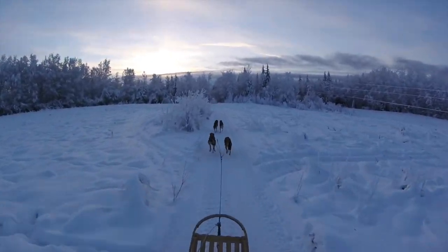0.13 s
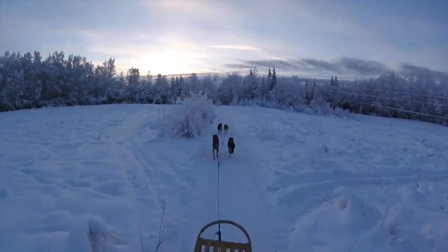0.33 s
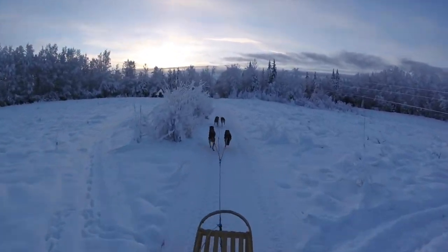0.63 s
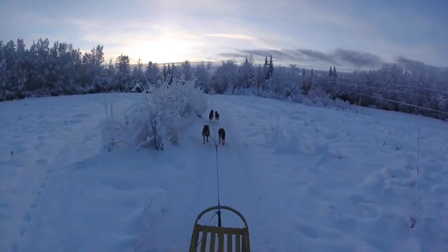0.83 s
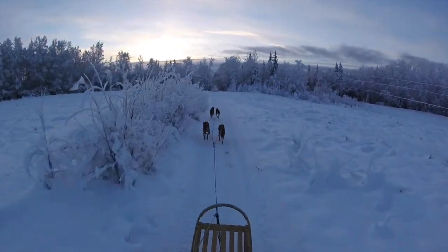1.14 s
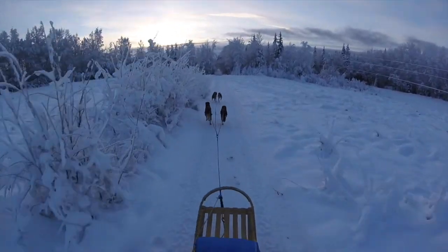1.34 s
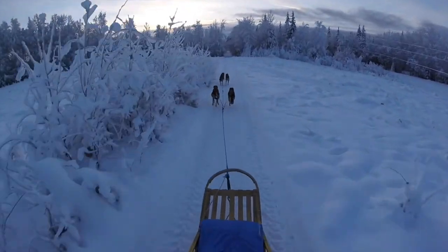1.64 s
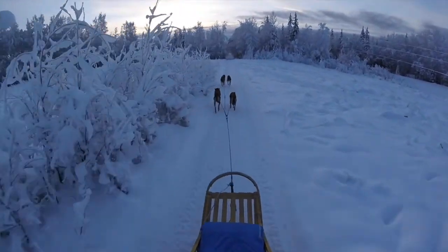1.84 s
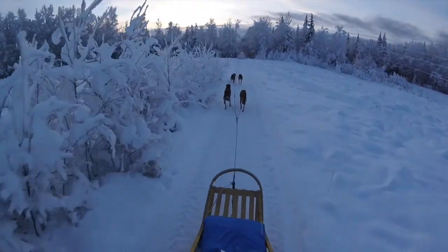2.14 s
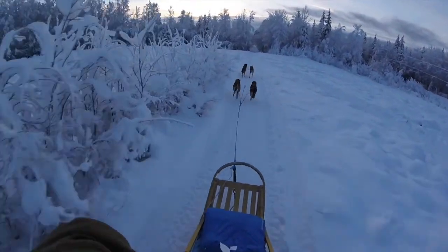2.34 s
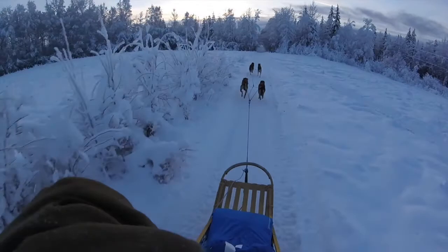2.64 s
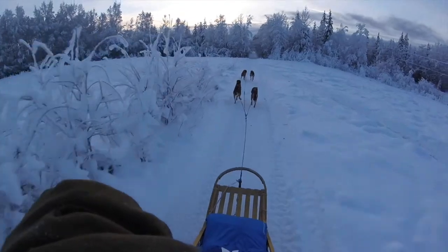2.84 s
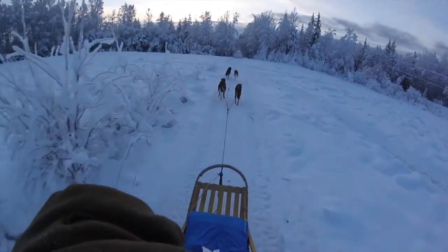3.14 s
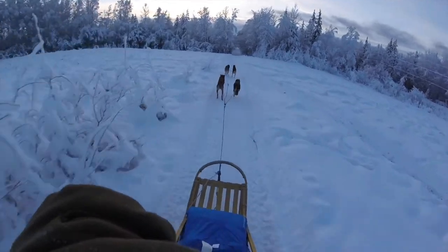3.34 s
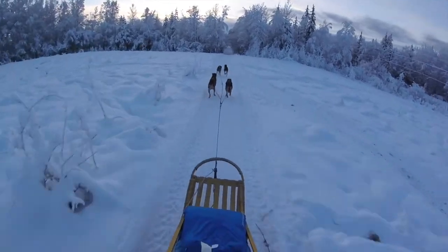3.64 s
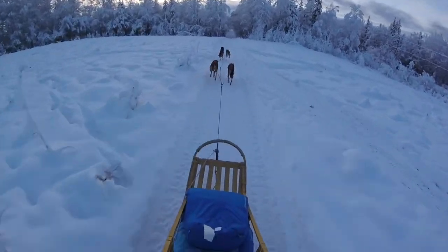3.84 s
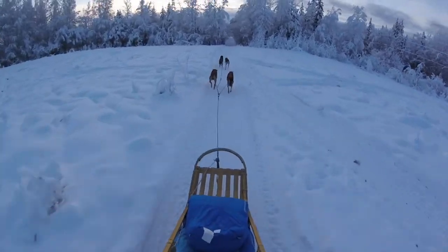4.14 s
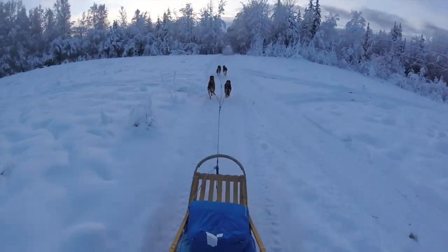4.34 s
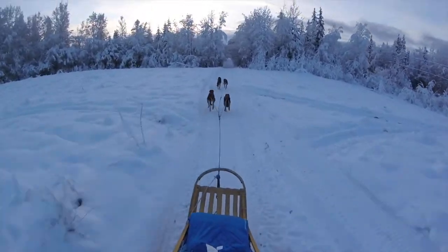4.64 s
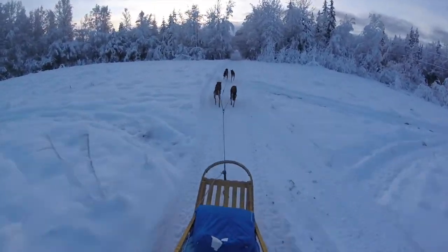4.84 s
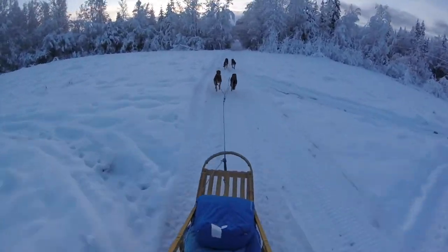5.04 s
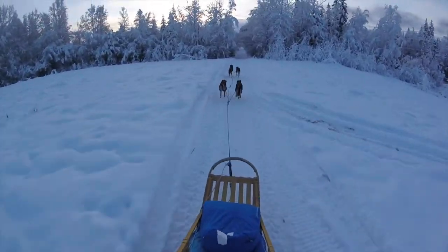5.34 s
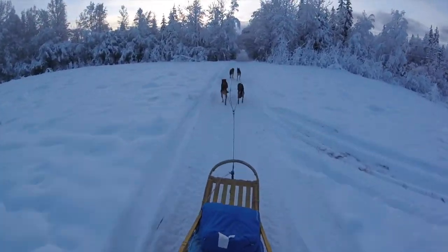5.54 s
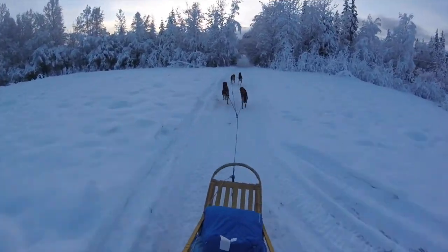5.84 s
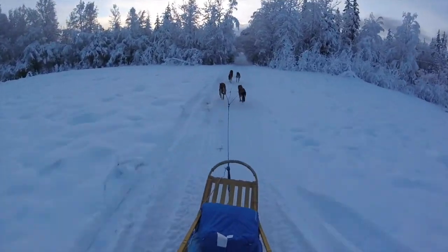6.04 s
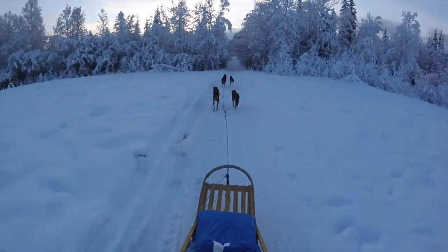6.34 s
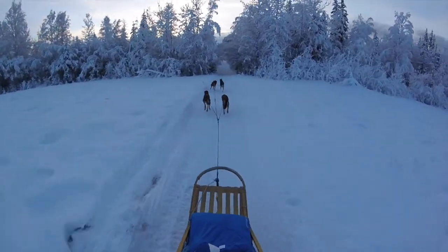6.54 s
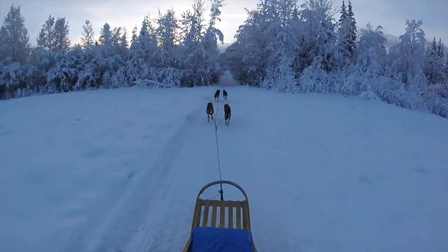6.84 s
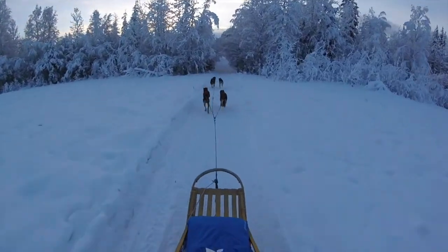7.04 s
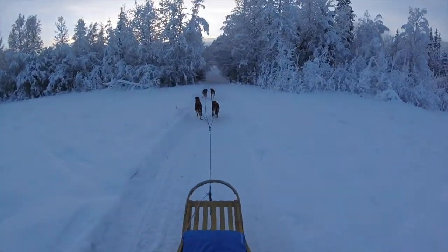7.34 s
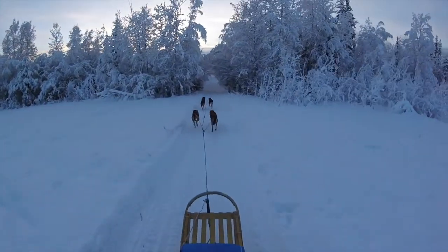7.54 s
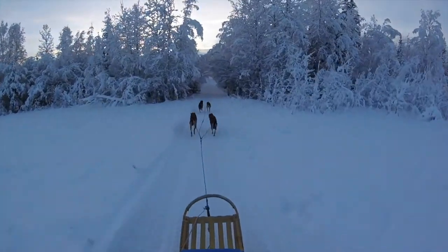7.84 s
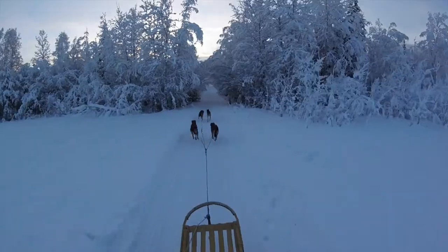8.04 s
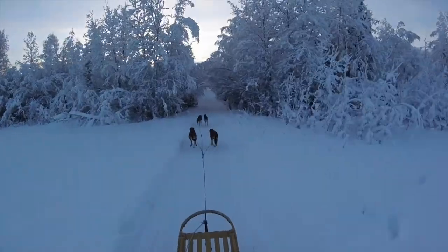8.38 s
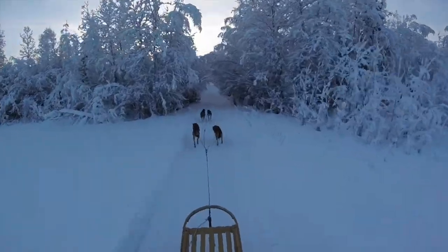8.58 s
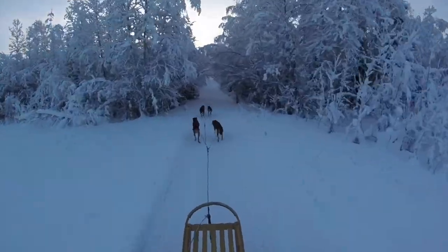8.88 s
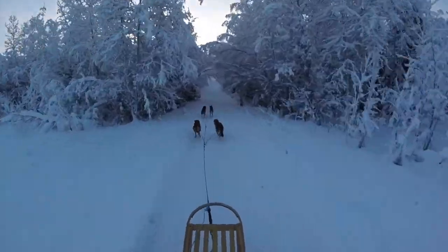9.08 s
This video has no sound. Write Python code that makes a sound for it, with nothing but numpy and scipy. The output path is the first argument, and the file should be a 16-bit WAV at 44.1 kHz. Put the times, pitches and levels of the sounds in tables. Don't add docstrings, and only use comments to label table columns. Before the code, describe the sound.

Steady crisp snow hiss under a gliding dog sled, with small crunches and creaks, increasingly buried by low, thudding wind buffeting.

```python
import sys
import numpy as np
from scipy import signal
from scipy.fft import rfft, irfft
from scipy.io import wavfile
from scipy.ndimage import uniform_filter1d

SR = 44100
rng = np.random.default_rng(int(sys.argv[2]) if len(sys.argv) > 2 else 0)


def dump(signal):
    limited = np.clip(np.atleast_2d(signal).T, -1, 1)
    pcm = np.round(limited * 32767).astype(np.int16)
    wavfile.write(sys.argv[1], SR, pcm)


def gain_from_db(level_db):
    decades = np.asarray(level_db, float) / 20
    return 10 ** decades


N = 406161
TIME = np.arange(N) / SR


def rms_one(x):
    return x / np.sqrt(np.mean(x ** 2) + 1e-20)


def in_time(rows):
    s, *columns = np.transpose(rows)
    return [np.interp(TIME, s, column) for column in columns]


def drift(rate):
    r = np.exp(-40 * np.pi * rate / SR)
    noise = rng.standard_normal(N // 20 + 2002)
    slow = signal.lfilter([1], [1, -2 * r, r * r], noise)[2000:]
    return np.interp(np.arange(N) / 20, np.arange(len(slow)), rms_one(slow))


def colour(x, spectrum):
    hz, db = np.transpose(spectrum)
    grid = np.fft.rfftfreq(8192, 1 / SR) + 1
    gain = gain_from_db(np.interp(np.log(grid), np.log(hz), db))
    cepstrum = irfft(np.log(gain))
    cepstrum[1:4096] *= 2
    cepstrum[4097:] = 0
    return signal.fftconvolve(x, irfft(np.exp(rfft(cepstrum))))[:N]


def cut(x, hz, kind):
    return signal.sosfilt(signal.butter(3, hz, kind, fs=SR, output="sos"), x)


def grains(per_s, spread_db, share):
    sizes = gain_from_db(spread_db * np.minimum(rng.exponential(1, N), 5)) * rng.choice((-1, 1), N)
    clicks = rms_one(sizes * (rng.random(N) < per_s / SR))
    return np.sqrt(share) * clicks + np.sqrt(1 - share) * rng.standard_normal(N)


def resonate(x, hz, width_hz):
    r = np.exp(-np.pi * width_hz / SR)
    poles = [1, -2 * r * np.cos(2 * np.pi * hz / SR), r * r]
    return signal.lfilter([(1 - r * r) / 2, 0, (r * r - 1) / 2], poles, x)


def swell(s, length):
    at = slice(int(s * SR), min(N, int((s + length) * SR)))
    return at, np.sqrt(np.hanning(at.stop - at.start))


# t/s, hiss level/dB, dull scrape of the load level/dB re hiss
GLIDE = [(0.0, -39, -11), (0.46, -40, -10), (1.31, -38, -10.5), (1.51, -35.5, -10.5), (2.67, -35, -12),
         (3.1, -37, -11.5), (3.33, -37, -12.5), (4.0, -33.5, -12.5), (4.74, -36, -13), (5.87, -34, -12.5),
         (6.1, -36, -12), (6.59, -34.5, -12.5), (7.39, -37, -9), (7.9, -36.5, -11), (8.26, -38, -9),
         (8.54, -36.5, -8), (8.87, -36, -9), (9.21, -37.5, -11)]
# t/s, length/s, hiss change/dB
PATCHES = [(0.023, 0.097, 3), (0.364, 0.13, 3), (0.66, 0.23, 2.5), (1.04, 0.096, 1.5), (1.433, 0.062, 3.5),
           (1.736, 0.042, 2.5), (1.914, 0.12, 3), (2.125, 0.12, 1), (2.34, 0.057, 2), (3.127, 0.099, 2),
           (4.79, .05, 3), (4.84, .08, -1.5), (5.383, 0.065, 0.5), (5.604, 0.16, 2), (6.268, 0.1, 2.5),
           (6.4, 0.11, 2), (6.798, 0.066, 4), (6.847, 0.028, 1), (7.153, 0.12, 3.5), (7.86, 0.077, 1),
           (8.15, 0.054, -3), (8.195, 0.056, 1), (8.24, 0.089, -2), (8.326, 0.12, 2.5), (8.885, 0.14, 2)]
# t/s, peak level/dB, dull part level/dB re peak
CRUNCHES = [(0.07, -26, -12), (0.4434, -29, -20), (0.4886, -24, -18), (0.7571, -29, -22), (1.264, -24, -18),
            (1.7535, -19.5, -7), (0.381, -29, -20), (0.42, -28, -14), (1.017, -26, -10), (1.298, -28, -10),
            (1.493, -30, -10), (1.995, -26, -7), (2.365, -22, -21), (2.408, -23, -23), (2.388, -25, -14),
            (2.658, -34, -10), (2.95, -28, -12), (3.664, -33, -4), (3.62, -32, 0), (3.71, -36, -2),
            (8.39, -30, 2), (3.5324, -38, -16), (5.4236, -22, -14), (4.8194, -26, -15), (4.926, -25, -7),
            (5.105, -30, -8), (5.626, -26, -10), (5.4183, -21, -17), (5.6964, -22, -21), (6.1928, -26, -10),
            (6.283, -20, -18), (6.39, -27, -12), (6.543, -28, 0), (7.24, -25, -21), (7.807, -29, -6),
            (8.889, -25, -3), (9.204, -35, -12), (7.89, -19.5, -7), (8.108, -22, -12), (8.3494, -21, -21)]
# t/s, peak level/dB
SNAPS = [
    (1.345, -19.5),
    (4.432, -26),
    (8.197, -36),
    (8.217, -36),
]
# f/Hz, level/dB per Hz
HOUSING = [(500, -53.5), (1300, -57.5), (2650, -54), (3200, -62.5), (4600, -72.5), (5250, -62), (6000, -71),
           (6450, -57.5), (7200, -67.5), (9400, -63.5), (10300, -75), (10800, -103), (11700, -85.5),
           (13000, -100)]
SCRAPE_TOP_HZ, FIZZ_LOW_HZ = 3800, 7300
CRUNCH_S = 0.0027


def runners():
    hiss_db, scrape_db = in_time(GLIDE)
    for s, length, change_db in PATCHES:
        at, shape = swell(s, length)
        hiss_db[at] += change_db * shape
    snow = colour(grains(per_s=4000, spread_db=3.6, share=0.4), HOUSING)
    scrape = rms_one(cut(snow, SCRAPE_TOP_HZ, "low"))
    upper = rms_one(cut(snow, SCRAPE_TOP_HZ, "high"))
    hiss = cut(upper, FIZZ_LOW_HZ, "low") * gain_from_db(0.64 * drift(81))
    fizz = cut(upper, FIZZ_LOW_HZ, "high") * gain_from_db(0.14 * drift(45))
    bumps = 0.57 * drift(13) + 0.67 * drift(39)
    bright = gain_from_db(hiss_db + bumps + 1.76)
    dull = gain_from_db(hiss_db + scrape_db + 0.62 * bumps + 1.1 * drift(48) + 9.5)
    for s, peak_db, dull_db in CRUNCHES:
        at = slice(int(s * SR), min(N, int((s + .03) * SR)))
        shape = np.exp((s - TIME[at]) / CRUNCH_S)
        bright[at] += gain_from_db(peak_db - 5.5) * shape
        dull[at] += gain_from_db(peak_db + dull_db + 3.0) * shape
    snap = np.zeros(N)
    for s, peak_db in SNAPS:
        at = slice(int(s * SR), int((s + .03) * SR))
        snap[at] += gain_from_db(peak_db) * np.exp((s - TIME[at]) / CRUNCH_S)
    return bright * hiss - (bright + snap) * fizz + dull * scrape


# t/s, big eddies level/dB, fineness (more of the lesser eddies)/dB
BREEZE = [(0, -31, 1.5), (1.1, -31, -1), (1.7, -31, -0.5), (2.3, -29, -1.5), (2.9, -35.5, 5.5),
          (3.25, -28.5, -2.5), (3.57, -27, -7), (4.0, -28, -4), (4.45, -32.5, 3.5), (5.06, -30.5, -3),
          (5.9, -29.5, -2), (6.15, -30.5, -0.5), (6.44, -31, -1), (6.97, -32.5, -1), (8.15, -26.5, 2),
          (8.44, -31.5, 6), (8.72, -29.5, 3), (9.21, -35, -2)]
BREEZE_MIDDLE_DB, BREEZE_SMALL_DB = -4, -8.5
# t/s, length/s, big eddies level/dB, middle eddies level/dB re big
PUFFS = [(0.033, 0.13, -32.5, -19), (0.123, 0.22, -26, -11.5), (.4, 0.043, -33, -18),
         (0.472, 0.12, -28.5, -6.5), (0.82, 0.046, -30.5, -5), (0.863, 0.12, -28, -20),
         (1.244, 0.088, -27.5, -5), (1.38, 0.12, -33.5, -2.5), (1.813, 0.098, -21, -5),
         (2.06, 0.067, -35, -21), (7.003, 0.023, -20.5, 0), (2.36, 0.14, -44, 5), (2.908, 0.04, -35, 3.5),
         (2.957, 0.054, -29, -9), (3.785, 0.09, -27.5, -7), (4.285, 0.13, -25.5, -13),
         (5.675, 0.17, -28.5, -5.5), (5.977, 0.096, -34, -1), (6.182, 0.059, -25, -18),
         (6.368, 0.023, -19, -12), (6.86, 0.11, -26.5, -24), (8.002, 0.15, -29, -14),
         (8.239, 0.088, -21.5, 0.5), (8.357, 0.03, -21.5, -2), (3.495, 0.054, -17, -23),
         (6.564, 0.086, -20, -8), (4.865, 0.054, -23, -18), (8.764, 0.043, -17, -9.5),
         (9.035, 0.058, -27, -5), (9.083, 0.16, -32.5, 2)]
PUFF_SMALL_DB, PUFF_SMALL_FOLLOWS = -5.5, 0.88
# t/s, length/s, big eddies level/dB, middle and small eddies level/dB re big
GUSTS = [(1.782, 0.16, -23, -4.5, -9.5), (1.975, 0.029, -20, -18, -19), (3.305, 0.05, -23.5, 0.5, -2.5),
         (3.375, 0.15, -24, 3, -5), (3.603, 0.082, -18.5, -8, -8.5), (3.646, 0.13, -24, 0.5, -5),
         (4.483, 0.054, -25.5, -1, -12), (4.566, 0.14, -26.5, 4.5, 0.5), (4.693, 0.18, -22, 0.5, -3.5),
         (4.855, 0.19, -23.5, -0.5, -8), (5.092, 0.041, -26.5, 6.5, -3), (5.186, 0.21, -21, -3.5, -11.5),
         (5.423, 0.11, -18.5, -7.5, -15), (5.548, 0.11, -20, -8, -15), (6.267, 0.082, -18, -7, -12),
         (6.474, 0.11, -19.5, -5.5, -10.5), (6.651, 0.064, -27, 8, 0.5), (6.723, 0.12, -19.5, -2, -8),
         (7.039, 0.12, -16.5, -2, -6.5), (7.161, 0.19, -20.5, -0.5, -0.5), (7.342, 0.31, -19.5, 0, -4.5),
         (7.62, 0.2, -14.5, -7, -9), (7.813, .17, -13.5, -7.5, -7.5), (8.188, .22, -28, -0.5, 3),
         (8.459, 0.12, -34, -1, 7), (8.59, 0.045, -28.5, 8, 2), (8.819, 0.13, -22, 5, -2),
         (8.944, 0.083, -23, 0.5, -2)]
ATTACK_S, RELEASE_S = (0.024, 0.037, 0.013), (0.026, 0.045, 0.0057)


def airflow():
    big_db, fine_db = in_time(BREEZE)
    middle_db = big_db + BREEZE_MIDDLE_DB + fine_db
    small_db = big_db + BREEZE_SMALL_DB + fine_db
    power = gain_from_db([big_db, middle_db, small_db]) ** 2
    puffs = [(*row, PUFF_SMALL_DB + PUFF_SMALL_FOLLOWS * row[-1]) for row in PUFFS]
    for s, length, db, middle_db, small_db in [*GUSTS, *puffs]:
        at = slice(max(int((s - .1) * SR), 0), int((s + length + .1) * SR))
        for size, rise, fall, re_db in zip(power, ATTACK_S, RELEASE_S, (0, middle_db, small_db)):
            onset = np.clip((TIME[at] - s) / rise + .5, 0, 1)
            ending = np.clip((s + length - TIME[at]) / fall + .5, 0, 1)
            size[at] += gain_from_db(db + re_db) ** 2 * onset * ending
    return 10 * np.log10(power)


# f/Hz, level/dB per Hz
EDDIES = [(15, -29), (50, -12.5), (100, -2.5), (190, -0.5), (300, -7), (450, -5.5), (650, -11.5),
          (950, -11.5), (1400, -20.5), (2000, -29.5), (2800, -35.5), (3300, -40), (5000, -49), (8000, -97)]
EDDY_SPLIT_HZ = (292, 311, 734, 790)
GRIT_HZ, GRIT_DB = 1490, 3


def wind(big_db, middle_db, small_db):
    flow = colour(grains(per_s=300, spread_db=1.0, share=0.36), EDDIES)
    lumps = 0.68 * drift(7.8) + 1.0 * drift(44)
    big_hz, low_hz, high_hz, small_hz = EDDY_SPLIT_HZ
    big = rms_one(cut(flow, big_hz, "low")) * gain_from_db(big_db + 1.1 * lumps - 2.0)
    middle = rms_one(cut(flow, [low_hz, high_hz], "band"))
    middle = middle * gain_from_db(middle_db + lumps + 0.55 * drift(24) - 0.73)
    small = cut(flow, small_hz, "high")
    bursts = gain_from_db(2.0 * drift(60) + 2.4 * drift(4.5) + GRIT_DB)
    grit = cut(small, GRIT_HZ, "high") * (bursts + 1)
    small = rms_one(small - grit) * gain_from_db(small_db + 0.27 * lumps + 0.57 * drift(16) - 4.5)
    return big + middle + small


# t/s, dip level/dB
SLAPS = [(1.8797, -11), (2.0021, -13), (3.3067, -13), (3.3833, -8), (3.615, -7), (3.6747, -6), (5.1054, -9),
         (3.6515, -11), (6.2997, -6), (6.3442, -4), (6.3872, -8), (6.477, -6), (6.5783, -7), (6.8082, -8),
         (6.8411, -4), (6.9715, -11), (7.8878, -4), (7.7058, -5), (7.7269, -4), (7.7426, -4), (7.7957, -5),
         (7.8283, -4), (7.9241, -4), (7.951, -4), (8.2382, -7), (8.3196, -5), (8.3927, -7), (8.7654, -6),
         (8.892, -5), (9.018, -8), (3.7237, -9), (3.7409, -10), (4.615, -10), (4.6734, -9), (4.8917, -8),
         (4.9559, -9), (5.3783, -10), (5.5119, -10), (5.589, -10), (6.3202, -9), (6.5934, -8), (6.6392, -9),
         (6.8205, -7), (7.207, -9), (7.2313, -8), (7.2918, -6), (7.3052, -6), (7.3206, -6), (7.4608, -6),
         (7.5103, -8), (7.5998, -8), (7.6467, -7), (7.6636, -6), (7.6798, -6), (7.7827, -6), (8.301, -7),
         (8.3703, -7), (8.6203, -9), (8.9068, -7), (8.9859, -9)]
SLAP_MS, SLAP_SPREAD = 0.91, 0.11
STRAY_SLAPS_PER_S, STRAY_SLAP_DB = 15, 7.5


def slaps(big_db):
    out, ms = np.zeros(N + 2000), np.arange(-300, 700) / SR * 1000
    moments = np.flatnonzero(rng.random(N)[300:] < STRAY_SLAPS_PER_S / SR) + 300
    strays = [(k / SR, big_db[k] + STRAY_SLAP_DB) for k in moments]
    uneven = rng.standard_normal(N)
    for s, dip_db in [*SLAPS, *strays]:
        width = SLAP_MS * np.exp(SLAP_SPREAD * uneven[int(s * SR)])
        side = np.where(ms < 0, 0.65, 0.58) * width
        dip = np.exp(-(ms / side) ** 2)
        rebound = 0.2 * np.exp(-((ms - 1.56 * width) / (1.05 * width)) ** 2)
        start = max(int(s * SR) - 300, 0)
        out[start:start + len(ms)] += gain_from_db(dip_db + 1.5) * (rebound - dip)
    return out[:N]


# t/s, length/s, start f/Hz, end
# f/Hz, level/dB
FLUTTER = [(2.342, 0.11, 345.5, 372, -29.5), (3.306, 0.046, 396, 388, -19), (3.438, 0.03, 371, 398, -12.5),
           (3.685, 0.042, 1040, 850, -19), (3.72, 0.049, 900, 800, -25.5), (4.28, 0.18, 98.3, 122, -25.5),
           (4.497, 0.087, 567, 610, -28), (4.68, 0.2, 850, 940, -23), (4.86, 0.053, 202.4, 169, -17),
           (4.943, 0.089, 1050, 1007, -28), (5.11, 0.068, 850, 930, -23), (5.2, 0.2, 134.6, 168, -20),
           (6.67, 0.1, 998, 935, -27), (6.899, 0.042, 950, 955, -31), (8.468, 0.042, 593, 522, -16),
           (8.521, 0.057, 618, 604, -25), (8.62, 0.067, 509, 530, -17), (4.601, 0.16, 254, 234, -20.5),
           (8.0, 0.075, 195, 216, -21), (9.07, 0.17, 292, 263, -40), (6.53, .13, 151, 160, -23),
           (8.83, 0.036, 425, 480, -18), (8.88, 0.082, 400, 494, -29), (8.94, 0.022, 170, 150, -19),
           (7.36, .2, 201, 189, -29), (8.22, 0.13, 158.6, 130, -25), (8.072, 0.36, 617, 617, -25),
           (8.198, 0.11, 604, 576, -28), (8.308, .035, 557, 520, -22), (8.36, 0.047, 559, 540, -22),
           (7.34, .11, 1042, 957, -26), (7.47, 0.086, 1000, 964, -25), (4.57, 0.084, 891, 1050, -26),
           (4.64, 0.052, 703, 600, -20), (4.76, 0.11, 956, 1000, -32), (4.95, 0.062, 172, 252, -23),
           (3.76, 0.033, 697, 800, -27), (9.08, 0.024, 282, 280, -20), (9.12, .025, 310, 300, -24),
           (9.175, 0.028, 290, 280, -20.5),
           (.415, 0.023, 200, 180, -25),
    (.81, .035, 190, 180, -25),
    (.92, 0.043, 190, 170, -22),
    (1.29, 0.054, 150, 160, -26),
    (3.483, 0.058, 278, 150, -17.5),
    (3.73, .04, 131, 120, -16),
    (4.89, .04, 150, 150, -17),
    (7.03, 0.1, 201, 170, -19),
    (7.2, 0.17, 151, 202, -19.5),
]
OVERTONE_DB = -26.5


def flutter():
    out, wobble, height = np.zeros(N), drift(70), drift(50)
    for s, length, start_hz, end_hz, db in FLUTTER:
        at, shape = swell(s, length)
        turns = np.cumsum(np.linspace(start_hz, end_hz, len(shape))) / SR
        phase = 2 * np.pi * turns + (start_hz / 600) ** 2 * wobble[at]
        tone = np.sin(phase) + gain_from_db(OVERTONE_DB) * np.sin(3 * phase)
        uneven = gain_from_db(start_hz / 260 * np.minimum(height[at], 1))
        out[at] += gain_from_db(db + 1.5) * shape * uneven * tone
    return out


# t/s, f/Hz,
# length/s, level/dB
CREAKS = [(1.354, 2300, 0.032, -36.5), (1.7497, 2200, 0.0045, -25), (1.75, 1650, .006, -34),
          (1.758, 2580, .005, -30), (1.835, 2500, 0.015, -34), (1.867, 2500, 0.05, -28),
          (3.649, 2450, .012, -33), (1.788, 2800, .02, -40), (4.9272, 2660, 0.0031, -26),
          (5.237, 2530, 0.039, -36), (6.19, 2530, 0.014, -40), (6.433, 2680, .03, -42),
          (8.45, 1650, 0.11, -36), (8.482, 2480, 0.055, -39), (8.11, 6600, .007, -34),
          (8.196, 6800, .008, -28), (8.215, 6800, 0.0068, -33), (8.229, 6800, .005, -34),
          (8.238, 6700, .006, -33)]


def creaks():
    out, rub = np.zeros(N), grains(per_s=4900, spread_db=-6.0, share=0.74)
    for s, hz, length, db in CREAKS:
        at, shape = swell(s, length)
        ring = resonate(resonate(rub[at], hz, 600), hz, 900)
        out[at] += gain_from_db(db) * shape * rms_one(ring)
    return out


SWEEP_S, SWEEP = .012, 0.8


def scene():
    big_db, middle_db, small_db = airflow()
    sled = runners() + creaks()
    flow, large = wind(big_db, middle_db, small_db), slaps(big_db)
    crowding = uniform_filter1d(np.abs(large), size=int(SWEEP_S * SR)) / gain_from_db(big_db)
    calm = 1 / (1 + SWEEP * crowding)
    return (calm * flow + large + flutter() + sled)[None]


# f/Hz, level/dB per bin
GATE = [(3600, -98), (4450, -78), (5000, -98), (9900, -100), (10300, -78), (11500, -81), (12200, -88),
        (13000, -90), (13700, -88)]
GATE_OPENS = (10, 23)


def gate(x):
    hz, frames, cells = signal.stft(x, SR, "cosine", 4096, 2048)
    power = uniform_filter1d(np.abs(cells) ** 2, size=12, axis=1)
    shifts = np.repeat(rng.normal(0, 3.5, (129, len(frames))), 16, axis=0)[:len(hz)]
    shifts[:, GATE_OPENS[0]::GATE_OPENS[1]] -= 10 * (hz[:, None] < 13000)
    bar = gain_from_db(np.interp(hz, *np.transpose(GATE))[:, None] + shifts)
    return signal.istft(cells * (power > bar ** 2), SR, "cosine", 4096, 2048)[1][:, :N]


def roll_off(x):
    return signal.sosfilt(signal.butter(12, 14120, fs=SR, output="sos"), x)


# f/Hz, level/dB per Hz
SELF_NOISE = [(9000, -36), (10500, 2), (11200, -3.5), (11700, -0.5), (12300, -4), (12900, -1), (13400, -12),
              (14000, -12)]
SELF_NOISE_DB = -59
RUMBLE_CUT_HZ, TOP_HZ = 49, 14900


def record(dry):
    own = rms_one(colour(rng.standard_normal(N), SELF_NOISE))
    own = own * gain_from_db(SELF_NOISE_DB + .8 * drift(5))
    x = cut(0.85 * np.tanh(dry / 0.91) + own, RUMBLE_CUT_HZ, "high")
    x = signal.sosfilt(signal.cheby2(10, 50, TOP_HZ, fs=SR, output="sos"), x)
    return roll_off(gate(x))


dry = scene()
out = record(dry)
dump(out)
```